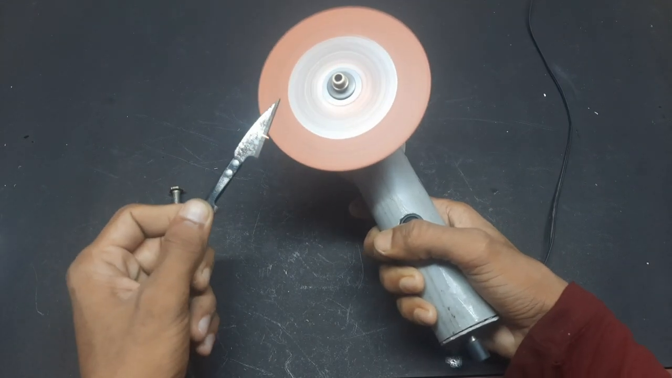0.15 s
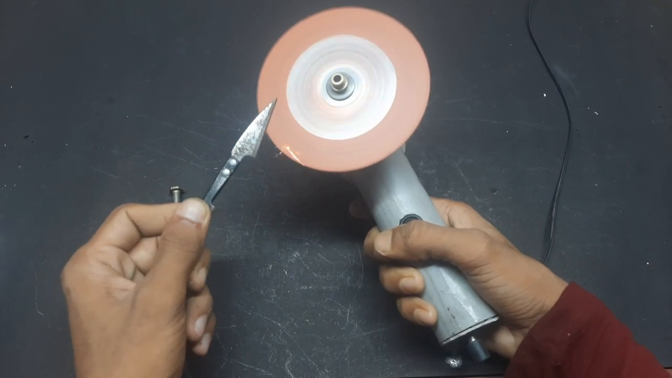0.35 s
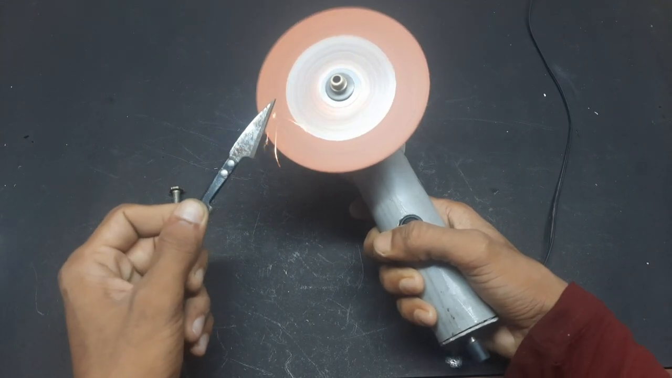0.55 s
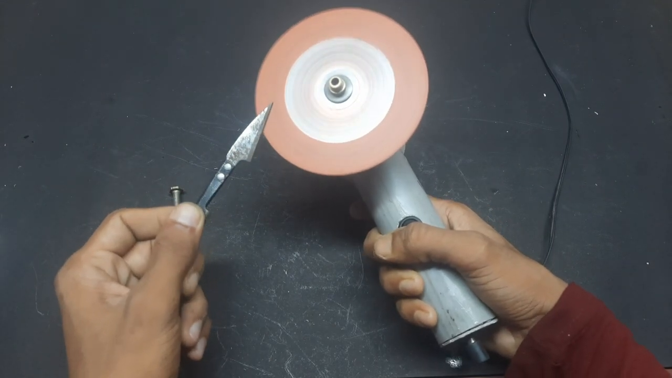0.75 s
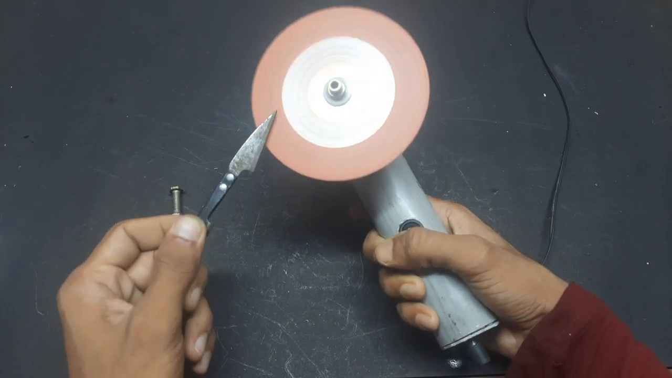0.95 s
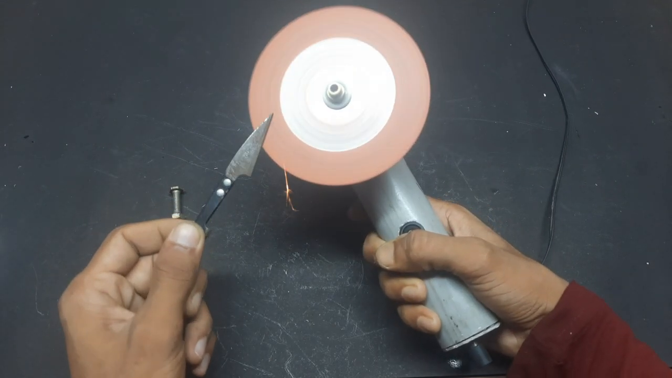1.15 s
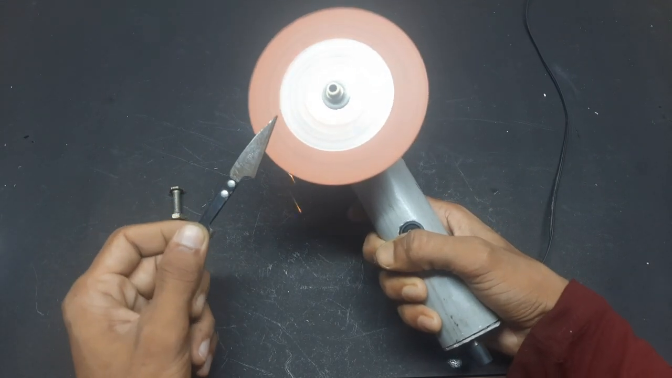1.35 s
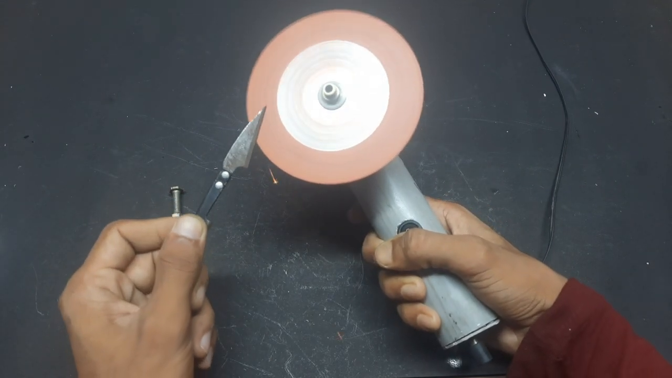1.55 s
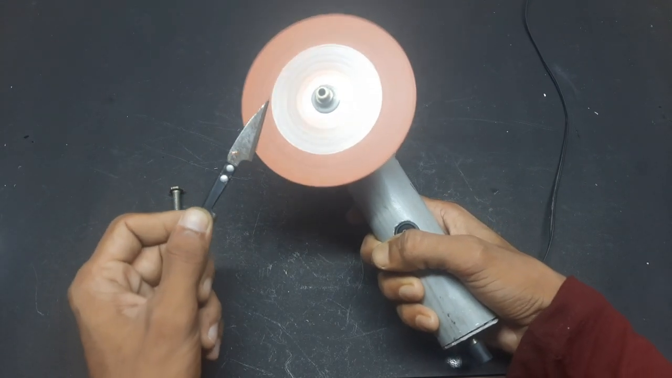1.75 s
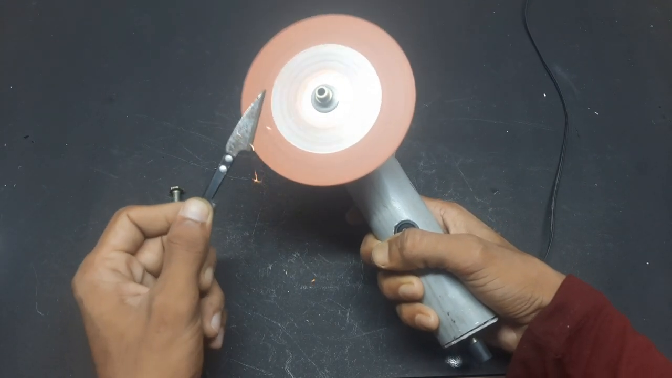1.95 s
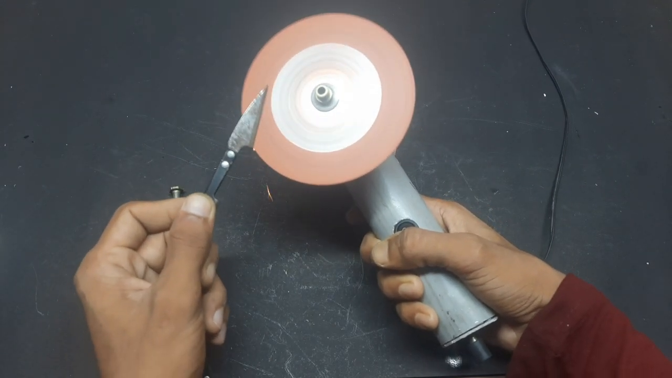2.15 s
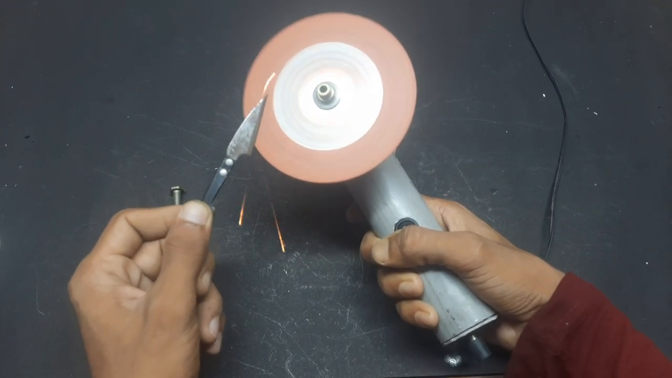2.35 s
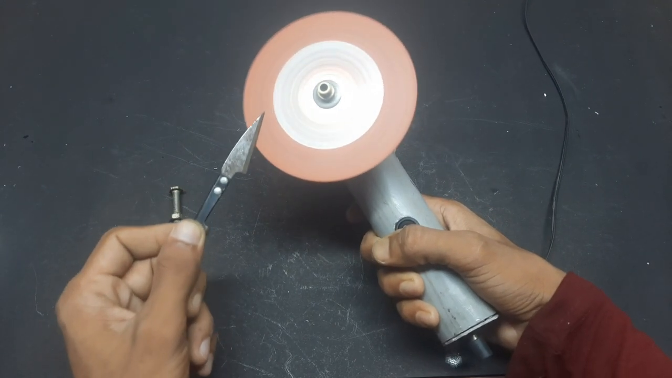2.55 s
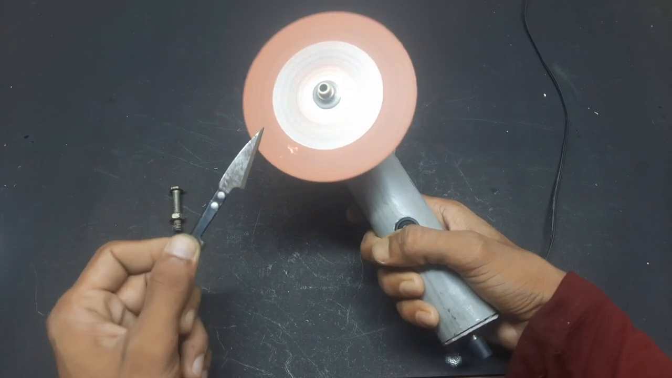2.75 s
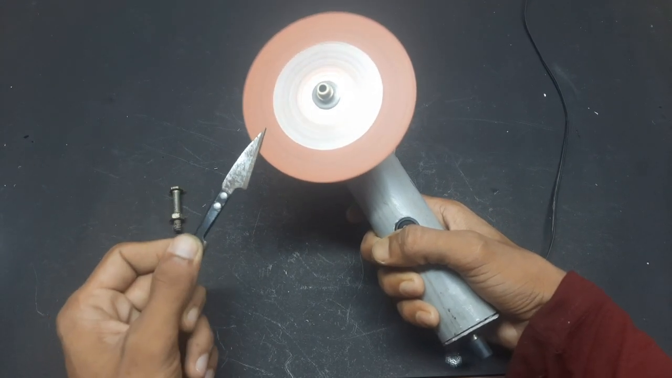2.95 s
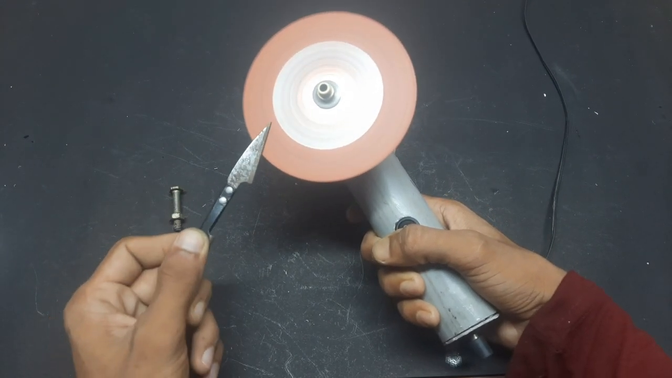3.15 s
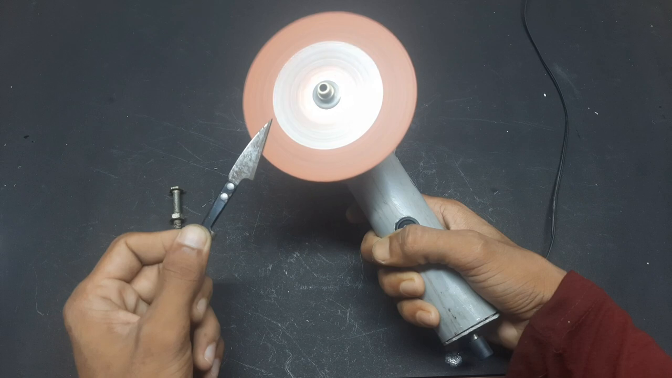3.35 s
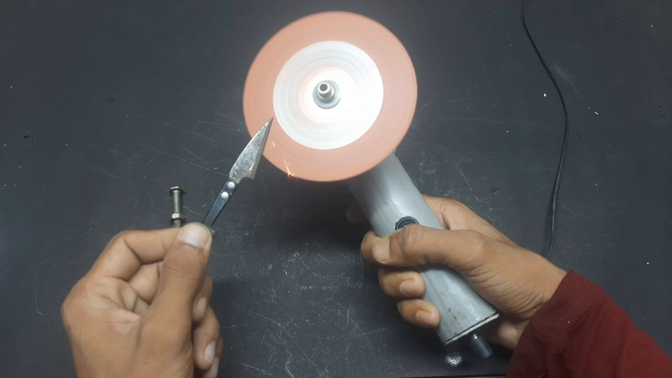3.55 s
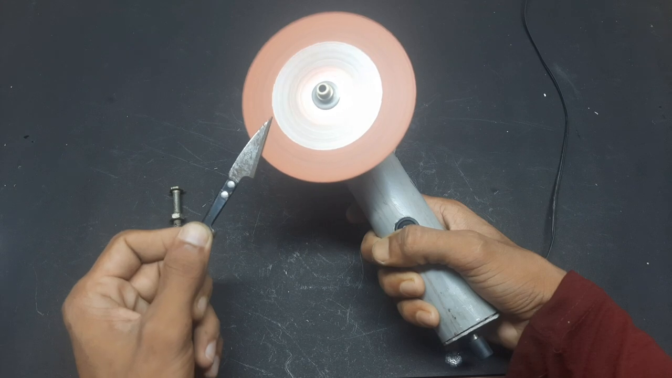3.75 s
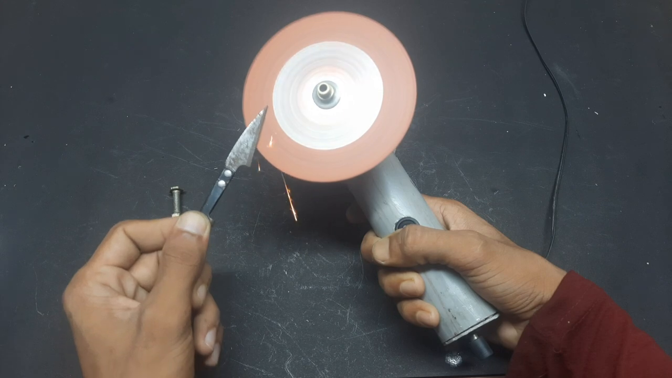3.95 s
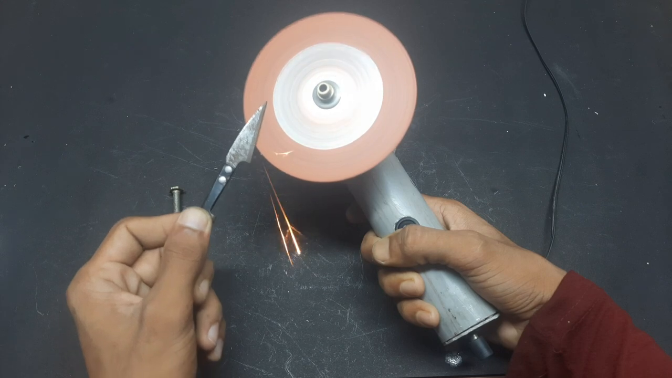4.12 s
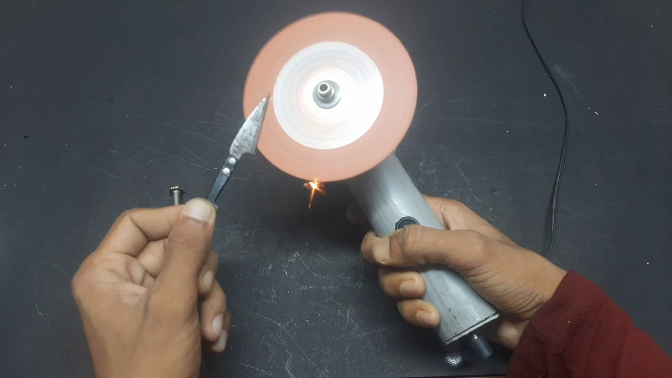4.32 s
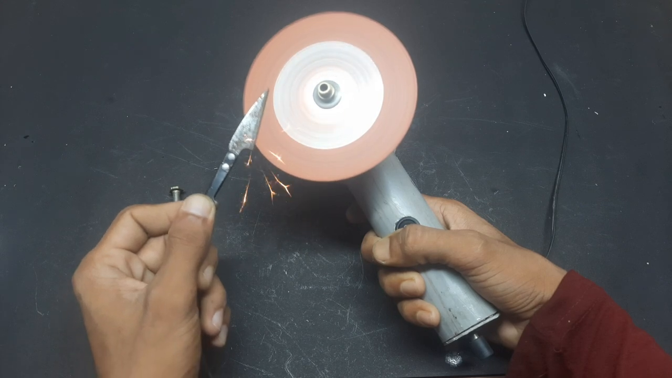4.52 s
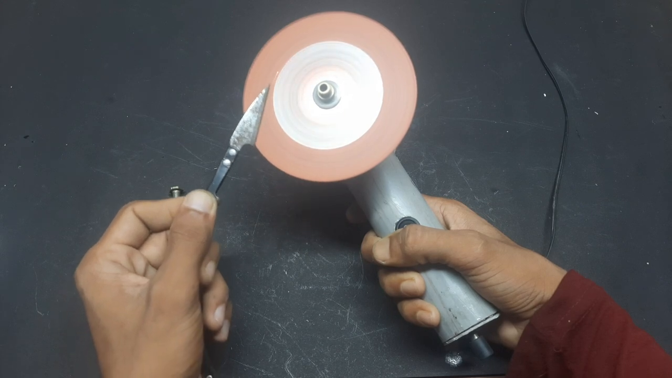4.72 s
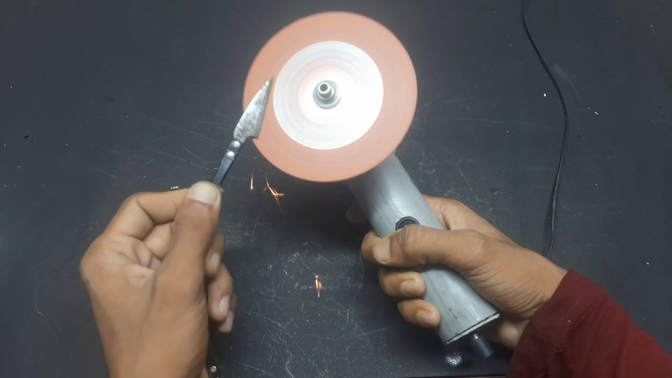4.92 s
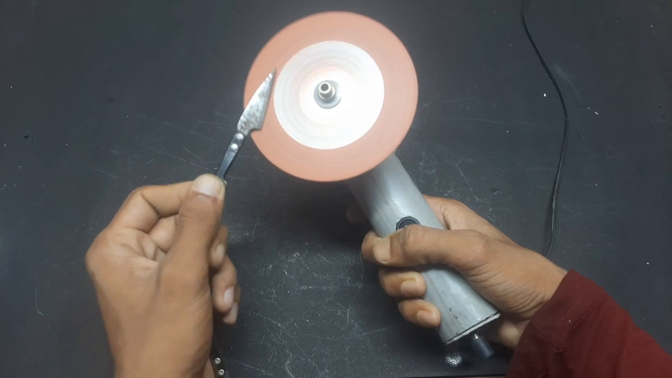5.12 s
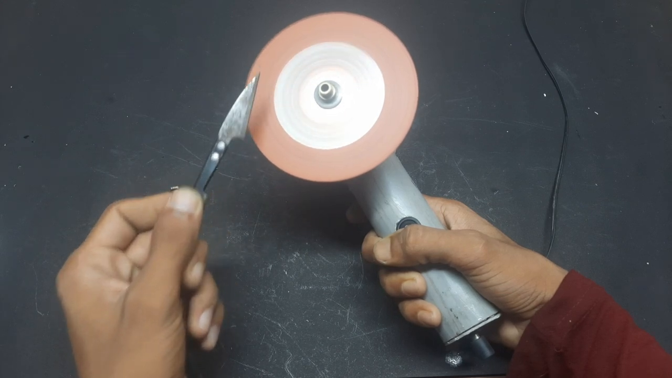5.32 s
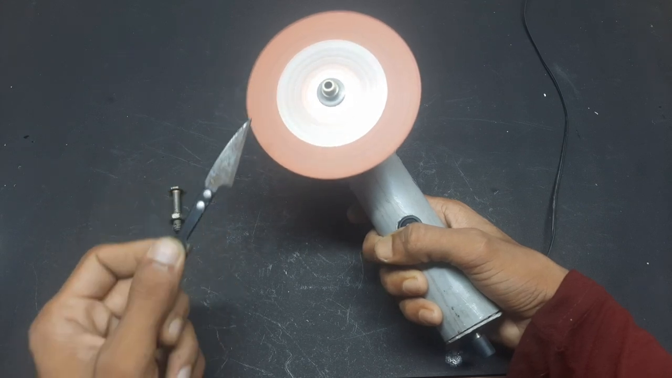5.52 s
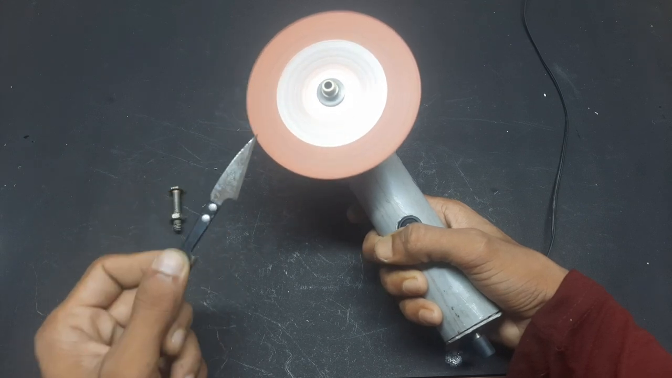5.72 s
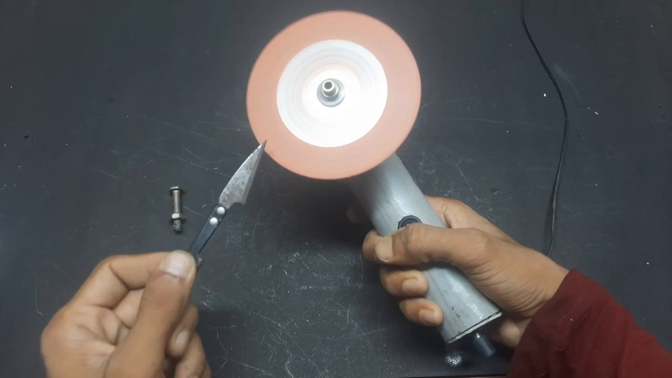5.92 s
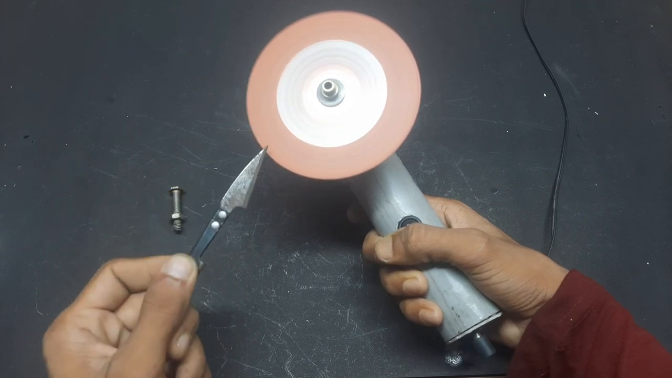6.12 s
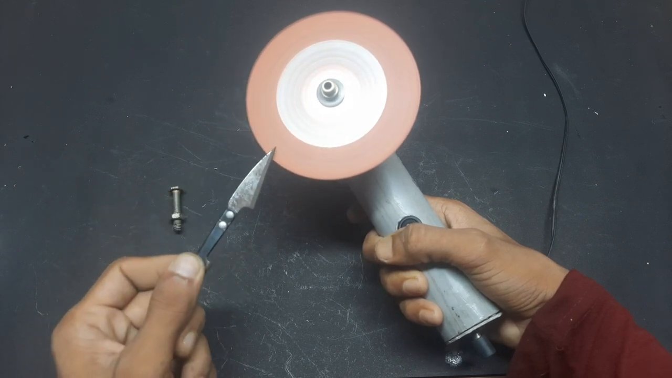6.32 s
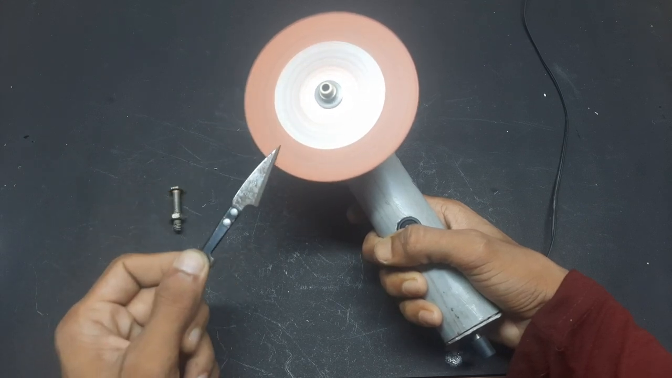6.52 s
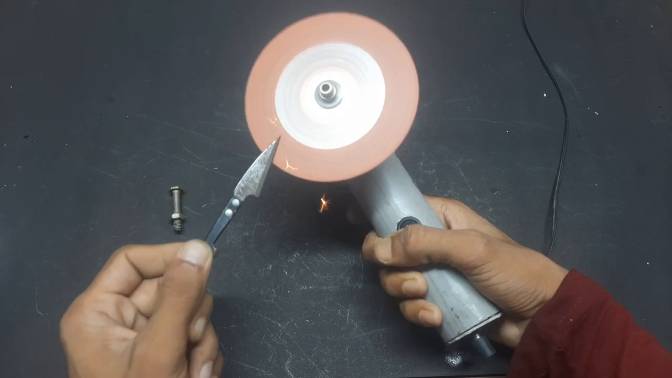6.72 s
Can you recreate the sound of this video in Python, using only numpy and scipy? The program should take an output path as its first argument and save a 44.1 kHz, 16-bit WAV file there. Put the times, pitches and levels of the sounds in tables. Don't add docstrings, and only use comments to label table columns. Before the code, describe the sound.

In a small workshop, a steel blade is already pressed to a spinning abrasive disc, making a loud, bright, fluttering hiss. It lifts for a moment, ticks against the wobbling rim and lands for a long stroke, then slips off with a tiny squeak. The motor whirs alone for about a second before rapid grazes bring the grinding back. Close microphone, right channel only; faint hiss on the left.

```python
import sys
import numpy as np
from scipy import signal
from scipy.fft import rfft, irfft
from scipy.io import wavfile
from scipy.ndimage import uniform_filter1d, map_coordinates

SR = 44100
rng = np.random.default_rng(int(sys.argv[2]) if len(sys.argv) > 2 else 0)


def wrap_up_sound(samples):
    columns = np.atleast_2d(samples).T
    tamed = np.clip(columns, -1, 1)
    steps = np.round(tamed * 32767).astype(np.int16)
    wavfile.write(sys.argv[1], SR, steps)


def voltage_ratio(decibels):
    exponent = np.asarray(decibels, float) / 20
    return 10 ** exponent


N = 302967

# time_s, speed_turns_per_s
DISC_SPEED = [(0.0, 39.23), (0.28, 38.07), (0.72, 39.46), (1.11, 45.6), (1.33, 45.02), (1.73, 40.21),
              (1.96, 40.43), (2.32, 38.2), (2.59, 39.03), (3.07, 43.58), (3.69, 39.62), (4.25, 39.03),
              (4.49, 39.95), (4.71, 39.15), (5.32, 41.27), (5.62, 44.7), (6.52, 45.37), (6.87, 43.01)]
# lands_s, leaves_s
CONTACTS = [
    (0, 0.92),
    (1.18, 5.31),
    (6.49, 6.87),
]
HOUSING_DB = -52.5


def in_time(rows):
    s, *columns = np.transpose(rows)
    return [np.interp(np.arange(N) / SR, s, c) for c in columns]


def round_rim(rows, turn):
    at, *columns = np.transpose(rows)
    return [np.interp(turn, at, c, period=1) for c in columns]


def colour(x, points, size=4096):
    hz, db = np.transpose(points)
    bin_hz = np.arange(size // 2 + 1) * SR / size
    log_gain = np.interp(np.log(bin_hz + 1), np.log(hz), db) * np.log(10) / 20
    cepstrum = irfft(log_gain)
    cepstrum[1:size // 2] *= 2
    cepstrum[size // 2 + 1:] = 0
    response = irfft(np.exp(rfft(cepstrum)))
    return signal.oaconvolve(x, response / np.linalg.norm(response))[:N]


def wander(size):
    slow = uniform_filter1d(uniform_filter1d(rng.standard_normal(N), size=size), size=size)
    return slow / slow.std()


def in_frames(x, size, gains):
    hz, _, cells = signal.stft(x, SR, "cosine", size)
    weighted = cells * gains(np.abs(cells) ** 2, hz[:, None])
    return signal.istft(weighted, SR, "cosine", size)[1][:N]


def surface(turn, memory, count):
    memory = np.clip(memory, 0, .99)
    fresh = rng.standard_normal((int(turn[-1]) + 40, count))
    relief = signal.lfilter([np.sqrt(1 - memory ** 2)], [1, -memory], fresh, axis=0)[30:]
    return relief.ravel()


def grit(turn, memory):
    cells_per_turn = 1100
    return surface(turn, memory, cells_per_turn)[(turn * cells_per_turn).astype(int)]


def patches(turn, db, count):
    relief = surface(turn, 0.87, count=count)
    gain = voltage_ratio(db * np.interp(turn * count, np.arange(len(relief)), relief))
    return gain / np.sqrt(np.mean(gain ** 2))


def touching(edge_s):
    t = np.arange(N) / SR
    gate = np.zeros(N)
    for lands, leaves in CONTACTS:
        inside_s = np.minimum(t - lands + 0.0039, leaves - t + 0.004)
        gate += np.clip(inside_s / edge_s, 0, 1)
    return gate


def pressure():
    # time_s, force_db (as grit hiss), seating_db (flat of the blade), tilt_db (onto the edge)
    hand = [(0, -30, 0.5, 6), (.14, -27.5, 0, -6), (.68, -26, -4, -3.5), (.85, -26.5, -8, -8),
            (1.17, -30.5, -3.5, -5), (1.44, -28.5, -1.5, 2), (1.71, -27, 1, -4.5), (2.24, -29, -2.5, 6),
            (2.64, -26.5, -2, -2), (2.8, -32, -10.5, 9), (3.05, -28, -10.5, 3), (3.3, -26.5, -1, -4),
            (4.39, -28.5, 2.5, 1), (4.65, -29, 1, 5), (5.25, -29, 0.5, -9.5), (6.49, -34.5, -10, 11),
            (6.62, -28.5, -12.5, 15), (6.87, -26, 0, -3)]
    # level_db (re grit hiss), seating_share, tilt_share
    layers = [
        (-0.25, 0.248, -0.07),
        (1.5, .01, 0.46),
        (-7, 1.2, .01),
        (-12, 0.28, 0.11),
        (-6.5, 0.37, -0.021),
    ]
    # start_s, peak_db, bending_db, ringing_db, length_ms
    grazes = [(0.9164, -21.5, -27, -13.5, 2.8), (0.9399, -11.5, -14.5, -4, 2.5),
              (1.103, -16.5, -18, -5, 2.7), (1.1241, -12, -41, -4.5, 2.6), (1.145, -4, -8, -18, 2.8),
              (1.1672, -1, -6, -9.5, 1.05), (6.4235, -12.5, -9.5, -15.5, 3.4), (6.444, -8, -7.5, -20, 2.62),
              (6.465, -2, -19.5, -19.5, 2.74), (6.488, -10, -5, -20, 1.7), (6.508, -13, -6, -33, 2.17),
              (6.5281, -19, -3, -28, 2.4), (6.553, -12, -9, -32, 1.6), (6.573, -18, -23, -26, 1.3),
              (6.5951, -10, -2.5, -27, 1.6)]
    lift_s, lift_db = 0.0564, -7.5
    land_s, land_db = 0.058, -0.5

    t = np.arange(N) / SR
    force_db, seat_db, tilt_db = in_time(hand)
    for _, leaves in CONTACTS[:-1]:
        force_db = force_db + lift_db * np.clip(1 + (t - leaves) / lift_s, 0, None) * (t < leaves + .05)
    for lands, _ in CONTACTS[1:]:
        force_db = force_db + land_db * np.clip(1 - (t - lands) / land_s, 0, 1) * (t > lands - .05)
    layers_db = [0 * t] + [db + seat * seat_db + tilt * tilt_db for db, seat, tilt in layers]
    held = touching(edge_s=.0013) * voltage_ratio(force_db + np.array(layers_db))

    grazed = np.zeros((3, N))
    for s, db, bend_db, ring_db, ms in grazes:
        near = slice(int(s * SR) - 200, int(s * SR) + 600)
        age = np.maximum(t[near] - s + 0.00082, 0) / (ms / 1000)
        pulse = age * np.exp(1 - age ** 2)
        grazed[:, near] += pulse * voltage_ratio(db + np.array([[-13], [bend_db - 16], [ring_db - 16.0]]))
    return held, grazed


def grinding(turn):
    # frequency_hz, density_db_per_hz
    hiss_spectrum = [(4000, -41), (6000, -23), (6400, -29.5), (8100, -22.5), (8400, -15), (9000, -11.5),
                     (11000, -3), (12400, -4.5), (13500, -2), (14400, -5.5), (15700, -12)]
    # frequency_hz, density_db_per_hz
    whistle_spectrum = [(11500, -36), (12300, -10), (12900, -5), (13300, 0), (13700, -4), (14200, -12),
                        (15000, -36)]
    # frequency_hz, density_db_per_hz
    top_spectrum = [(12000, -48), (14300, -0.5), (14900, 19.5), (15300, 15), (16000, 2.5)]
    # frequency_hz, density_db_per_hz
    bend_spectrum = [(560, -51.5), (960, -52.5), (1030, -32.5), (1080, -14), (1190, -26.5), (1210, -11.5),
                     (1420, 2), (1590, 2.5), (1730, -3.5), (1840, -9), (1900, -19.5), (2470, -19),
                     (4180, -120)]
    # frequency_hz, density_db_per_hz
    free_spectrum = [(900, -50), (1250, -10), (1390, 0.5), (1430, -1.5), (1480, 5.5), (1650, -35),
                     (1900, -20.5), (3000, -50)]
    # frequency_hz, density_db_per_hz
    body_spectrum = [(1120, -30.5), (1900, -12), (1930, -10), (2100, -3), (2200, -1), (2960, -7),
                     (3600, 0.5), (4680, -17.5), (7920, -120)]
    # frequency_hz, density_db_per_hz
    ring_spectrum = [(2060, -25), (3500, -14), (4300, 7), (4450, 4), (4850, -4), (5460, -3.5),
                     (6300, -13.5), (8190, -29), (13900, -120)]
    # position_turn, hiss_db, bending_db
    rim = [(0.0, 3, -2), (.12, 2.6, -2.5), (.3, -1.5, -2), (.42, -3, 3), (.55, -1.5, 0), (.74, -3, 2.5),
           (.8, 2.6, 3), (.9, 2.4, 1.5)]

    (hiss, whistle, top, bend, body, ring), (scratch, flick, tick) = pressure()
    hiss_db, bend_db = round_rim(rim, turn)
    bite = voltage_ratio(hiss_db) * patches(turn, 1.0, count=14)
    out = colour(grit(turn, 0.25) * (hiss * bite + scratch), hiss_spectrum)
    whistle = whistle * bite * patches(turn, 0.4, count=9)
    out += colour(grit(turn, 0.3) * (whistle + 0.085 * scratch), whistle_spectrum)
    top = top * bite * patches(turn, 1.0, count=10)
    out += colour(grit(turn, 0.25) * (top + 0.48 * scratch), top_spectrum)
    bend = bend * voltage_ratio(bend_db) * patches(turn, 1.75, count=6)
    out += colour(grit(turn, memory=.76) * bend, bend_spectrum)
    out += colour(rng.standard_normal(N) * flick, free_spectrum)
    body = body * patches(turn, 3.45, count=8)
    out += colour(grit(turn, memory=.55) * (body + .5 * tick), body_spectrum)
    ring = ring * patches(turn, 0.96, count=12)
    out += colour(grit(turn, 0.306) * (ring + tick), ring_spectrum)
    return out


def shifting_grip(power, hz):
    field = rng.standard_normal(power.shape)
    for _ in range(2):
        field = uniform_filter1d(uniform_filter1d(field, size=7, axis=0), size=13, axis=1)
    depth_db = np.interp(hz, [1500, 9000], [.9, 2.2])
    return voltage_ratio(depth_db * field / field.std())


def motor(turn):
    # position_turn, level_db
    shaft = [(0, -1), (.08, 3), (.2, 5.5), (.28, 4), (.36, 1), (.5, 1), (.58, -4), (.75, -5), (.9, -3)]
    # frequency_hz, density_db_per_hz
    housing_spectrum = [(600, -39), (1020, -22.5), (1110, 3), (1280, -2.5), (1600, 2.5), (1880, -8),
                        (2200, -15), (2700, -7), (3000, -13), (3330, -12.5), (3600, -16.5), (5000, -20),
                        (6000, -35.5), (8000, -115)]
    # frequency_hz, density_db_per_hz
    rotor_spectrum = [(3000, -54), (4230, 14), (4290, -4), (4370, 16), (5500, -91)]
    # frequency_hz, density_db_per_hz
    brush_spectrum = [(3410, -52), (5800, -10.5), (6440, -15.5), (7270, -23.5), (9050, -7), (10300, -3.5),
                      (12100, -6.5), (13100, -5), (13600, -9), (14700, -14), (15800, -15.5)]
    # frequency_hz, level_db
    whine_resonance = [(1430, -63), (1480, -58), (1548, -58), (1570, -59), (1590, -90)]
    # shaft_order, level_db
    slot_tones = [(37, -64), (60, -72), (73, -71), (97, -79)]
    whine_order, rotor_db, brush_db = 35, -33, -68.5

    shaft_db, = round_rim(shaft, turn)
    housing = colour(grit(turn, memory=.98) * voltage_ratio(HOUSING_DB + shaft_db), housing_spectrum)
    rotor = colour(grit(turn, .99), rotor_spectrum) * voltage_ratio(HOUSING_DB + rotor_db)
    whine_db = np.interp(whine_order * in_time(DISC_SPEED)[0], *np.transpose(whine_resonance))
    whine = voltage_ratio(whine_db + 3 + .4 * shaft_db) * np.sin(2 * np.pi * whine_order * turn)
    slots = np.zeros(N)
    for order, db in slot_tones:
        slots += voltage_ratio(db + 0.9 * shaft_db) * np.sin(2 * np.pi * round(order) * turn)
    ticks_db = 2.1 * np.cos(2 * np.pi * 5 * turn - 2.2)
    brushes = colour(grit(turn, 0.55) * voltage_ratio(brush_db + ticks_db), brush_spectrum)
    return housing + rotor + slots + whine + brushes


def background():
    # frequency_hz, density_db_per_hz
    air_spectrum = [(88, -27), (150, -36), (206, 3), (268, 0.5), (297, -0.5), (324, -1), (371, -3.5),
                    (459, 3.5), (517, -2.5), (602, -1.5), (651, -4.5), (814, -12.5), (1000, -4),
                    (1300, -45), (2200, -120)]
    # frequency_hz, density_db_per_hz
    rumble_spectrum = [(12, -49.5), (20, -23.5), (48, -19.5), (86, 7), (146, 4.5), (180, 6.5), (230, -14),
                       (400, -120)]
    # time_s, rise_db
    shifts = [(0.02, 8.5), (2.22, 11), (4.62, 6.5), (5.13, 12), (6.56, 12)]
    # frequency_hz, level_db
    mains = [(300.2, -61.5)]

    t = np.arange(N) / SR
    air, rumble = rng.standard_normal((2, N))
    air_db = -54.5 + 1 * touching(edge_s=0.017) + 2 * wander(int(0.062 * SR))
    rumble_db = -74 + 5 * touching(edge_s=0.018) + 2.5 * wander(size=3000)
    shift_s = 0.13
    rumble_db += sum(db * np.exp(-((t - s) / shift_s) ** 2) for s, db in shifts)
    hum = sum(voltage_ratio(db + 3.5) * np.sin(2 * np.pi * hz * t) for hz, db in mains)
    return voltage_ratio(air_db) * colour(air, air_spectrum) + voltage_ratio(rumble_db) * colour(rumble, rumble_spectrum) + hum


def workshop(x):
    t60_s, echo_db = 0.3, -5.5
    sway_s, sway_pace_s = .0003, .25
    t = np.arange(SR // 2) / SR
    tail = rng.standard_normal(len(t)) * voltage_ratio(-60 * t / t60_s) * (t > .004)
    path = np.arange(N) + sway_s * SR * wander(int(sway_pace_s * SR))
    sent = map_coordinates(x, [path], order=3)
    return x + voltage_ratio(echo_db) * signal.oaconvolve(sent, tail / np.linalg.norm(tail))[:N]


def jolts():
    # start_s, peak_db
    strikes = [(0.043, -42), (0.223, -35), (0.478, -39), (1.613, -45), (1.681, -38), (2.035, -38),
               (2.084, -34), (2.415, -42), (2.893, -42), (3.459, -37), (3.683, -48), (3.708, -47),
               (3.733, -47.5), (3.758, -51.5), (3.962, -39), (4.038, -43), (4.111, -42), (4.164, -47.5),
               (4.443, -47), (4.547, -41), (4.729, -43), (4.847, -38), (4.87, -50), (6.466, -40),
               (6.487, -39)]
    # frequency_hz, density_db_per_hz
    click_spectrum = [(30, -12.5), (300, 5), (800, 4), (1500, 12), (4000, -40)]
    s, db = np.transpose(strikes)
    clicks = np.zeros(N)
    clicks[(s * SR).astype(int)] = voltage_ratio(db + 20.5)
    return colour(clicks, click_spectrum)


def squeak():
    # time_s, pitch_hz, level_db
    glide = [
        (5.272, 4250, -62.5),
        (5.285, 4350, -32),
        (5.305, 4820, -53),
        (5.315, 4700, -62),
    ]
    hz, db = in_time(glide)
    rough = 1 + .5 * colour(rng.standard_normal(N), [(100, -7), (400, -22)])
    sounding = db > glide[0][2] + 1
    return voltage_ratio(db + 2.5) * sounding * rough * np.sin(2 * np.pi * np.cumsum(hz) / SR)


def scene():
    start_turn = .264
    turn = start_turn + np.cumsum(in_time(DISC_SPEED)[0]) / SR
    steel = in_frames(grinding(turn), size=1024, gains=shifting_grip) + squeak()
    live = workshop(steel + motor(turn)) + jolts() + background()
    return np.array([0 * live, 2 * live])


def starved_bands(power, hz):
    narrow = uniform_filter1d(power, size=4, axis=0)
    wide = uniform_filter1d(power, size=17, axis=0)
    dropped = (narrow < wide * voltage_ratio(-11.5)) & (hz > 1800) & (hz < 8300)
    return np.where(dropped, .08, 1)


def low_pass(x):
    return signal.sosfilt(signal.butter(12, 17100, fs=SR, output="sos"), x)


def record(dry):
    # frequency_hz, density_db_per_hz
    idle_spectrum = [(20, -14), (65, 0), (250, -3), (500, -11), (2000, -19), (4000, -26), (8000, -31),
                     (13000, -29), (15600, -31)]
    peak, lopsided_db, idle_db, cutoff_hz = 0.89, -34.5, -78, 15720
    live = dry[1]
    flutter_band = signal.butter(2, [110, 900], "band", fs=SR, output="sos")
    flutter = signal.sosfilt(flutter_band, live ** 2)
    live = peak * np.tanh(live / peak) + voltage_ratio(lopsided_db) * flutter
    live = in_frames(live, size=2048, gains=starved_bands)
    hiss = voltage_ratio(idle_db) * colour(rng.standard_normal(N), idle_spectrum)
    top_cut = signal.ellip(14, .5, 62, cutoff_hz, fs=SR, output="sos")
    both = signal.sosfilt(top_cut, [hiss, live])
    return low_pass(both)


dry = scene()
out = record(dry)
wrap_up_sound(out)
```